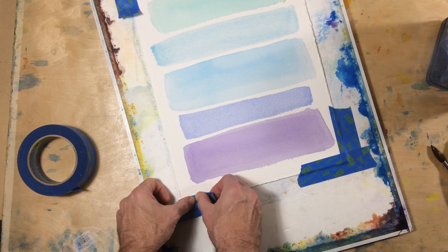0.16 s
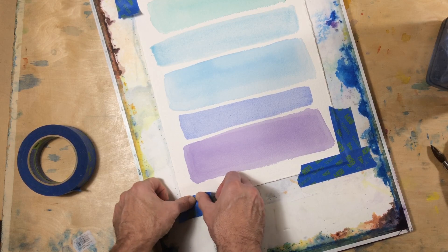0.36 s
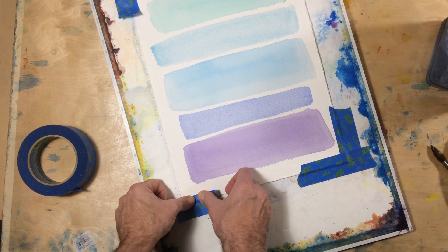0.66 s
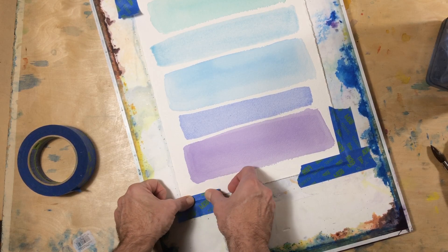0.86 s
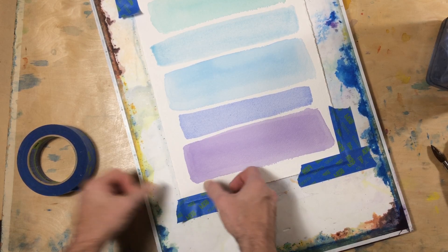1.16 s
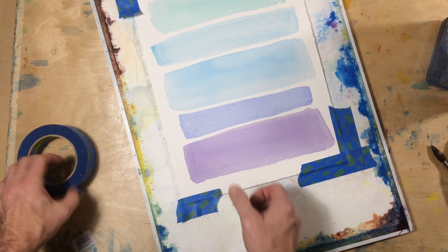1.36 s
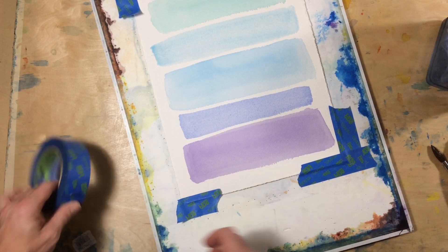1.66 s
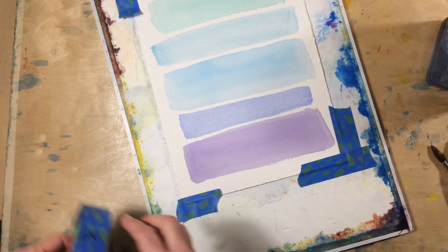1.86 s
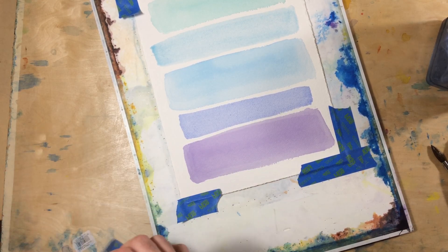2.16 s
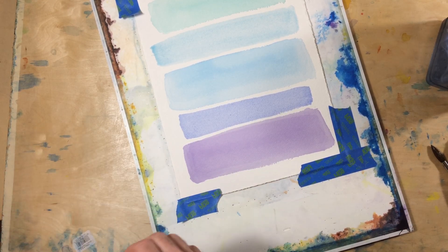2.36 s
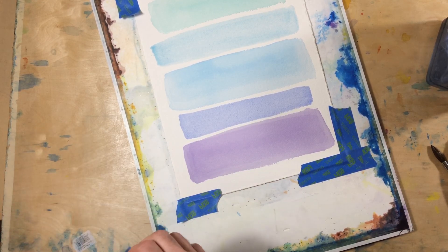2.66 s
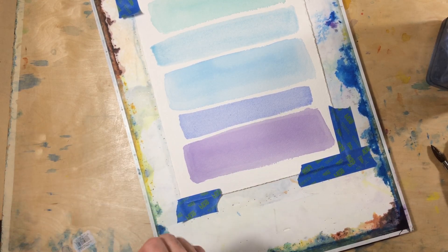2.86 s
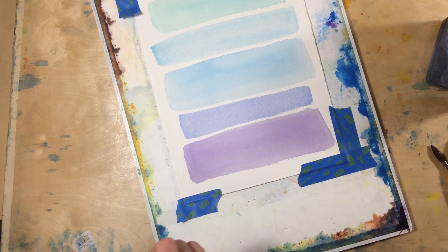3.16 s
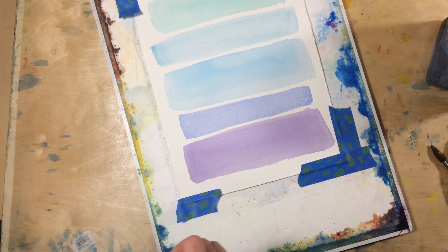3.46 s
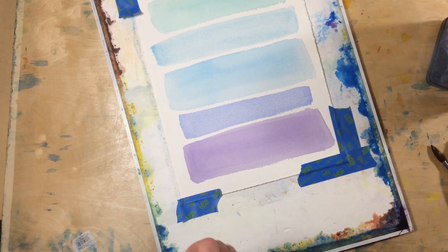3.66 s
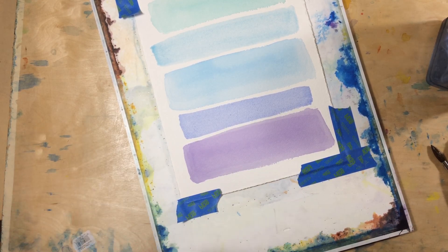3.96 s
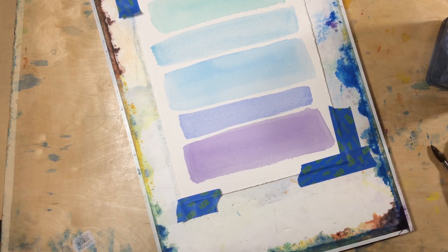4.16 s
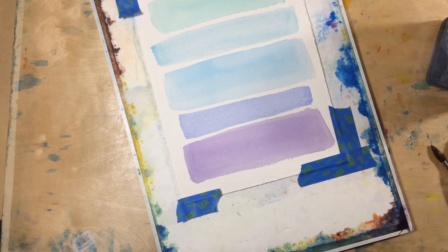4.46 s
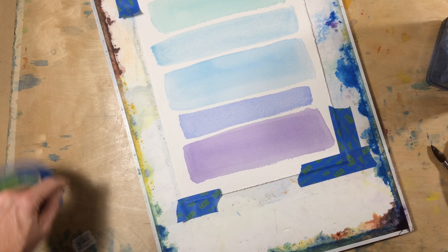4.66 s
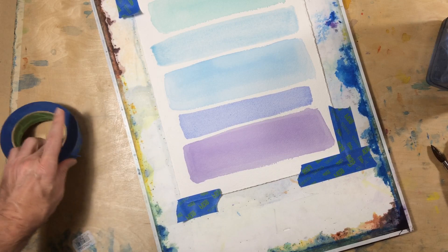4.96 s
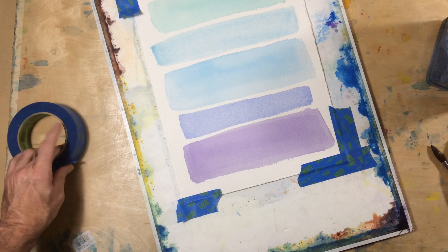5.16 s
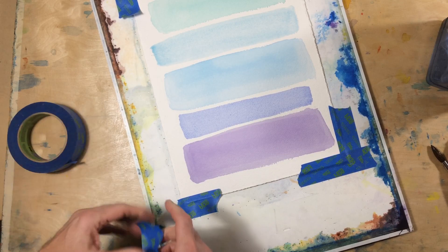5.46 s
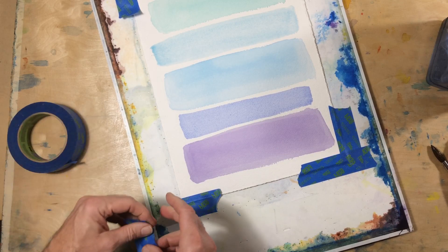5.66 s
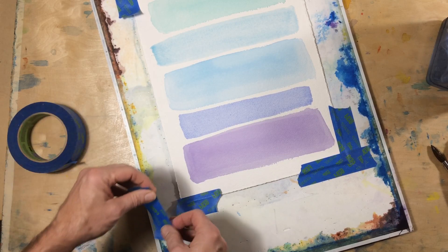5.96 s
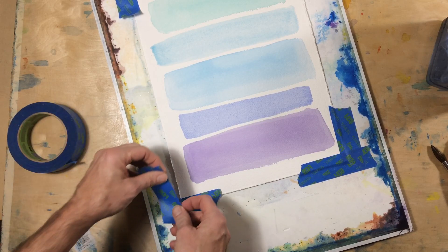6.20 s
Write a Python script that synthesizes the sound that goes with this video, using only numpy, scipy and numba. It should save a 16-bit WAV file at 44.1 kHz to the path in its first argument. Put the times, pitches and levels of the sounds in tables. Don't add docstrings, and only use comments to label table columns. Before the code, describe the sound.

Masking tape handled at a wooden desk: crisp ticks, a rasping two-part pull with falling hollow tone, a short rip, and a loud clack.

```python
import sys
import numpy as np
from scipy import signal
from scipy.fft import rfft, irfft
from scipy.io import wavfile
from scipy.ndimage import uniform_filter1d
from numba import njit

SR = 44100
rng = np.random.default_rng(int(sys.argv[2]) if len(sys.argv) > 2 else 0)


def generate_wav(signal):
    frames = np.transpose(np.atleast_2d(signal))
    scaled = np.clip(frames, -1, 1) * 32767
    pcm = np.round(scaled).astype(np.int16)
    wavfile.write(sys.argv[1], SR, pcm)


def volts(x):
    e = np.asarray(x, float) / 20
    return 10 ** e


N = 279153


def curve(tables, column, off=-130):
    t, out = np.arange(N) / SR, np.full(N, float(off))
    for rows in tables:
        rows = np.array(rows)
        inside = (t >= rows[0, 0]) & (t <= rows[-1, 0])
        out[inside] = np.interp(t[inside], rows[:, 0], rows[:, column])
    return out


def gain_curve(tables, column):
    return uniform_filter1d(volts(curve(tables, column)), size=201)


def swells(rows):
    t, out = np.arange(N) / SR, np.zeros(N)
    for s, db, rise, fall in rows:
        near = slice(max(int((s - 3 * rise) * SR), 0), int((s + 3 * fall) * SR))
        late = t[near] - s
        out[near] += volts(db - 20 * np.maximum(-late / rise, late / fall))
    return out


def rms_one(x):
    return x / np.sqrt(np.mean(x ** 2) + 1e-20)


def peak_one(x):
    return x / np.abs(x).max()


def coloured(x, spectrum):
    hz, db = np.transpose(spectrum)
    grid = np.maximum(np.arange(len(x) // 2 + 1) * SR / len(x), 1)
    gain = volts(np.interp(np.log(grid), np.log(hz), db, left=-90, right=-90))
    return rms_one(irfft(rfft(x) * gain, len(x)))


def band(x, low_hz, high_hz):
    sos = signal.butter(2, [low_hz, min(high_hz, .45 * SR)], "band", fs=SR, output="sos")
    return signal.sosfilt(sos, x)


def cut(x, top_hz):
    return signal.sosfilt(signal.ellip(10, .5, 60, top_hz, fs=SR, output="sos"), x)


def slow_wander(hz, rate, size):
    r = np.exp(-2 * np.pi * hz / rate)
    return rms_one(signal.lfilter([1], [1, -2 * r, r * r], rng.standard_normal(size)))


def grains(spread_db, clump_db, clump_hz):
    sizes = rng.standard_normal(N) * volts(spread_db * np.minimum(rng.exponential(1, N), 5))
    return sizes * volts(clump_db * slow_wander(clump_hz, SR, N))


def ring(x, hz, t60):
    r, w = volts(-60 / (t60 * SR)), 2 * np.pi * hz / SR
    return signal.lfilter([0, np.sin(w)], [1, -2 * r * np.cos(w), r * r], x)


@njit
def glide(x, hz, width):
    out = np.zeros(len(x))
    r = np.exp(-np.pi * width / SR)
    for i in range(2, len(x)):
        out[i] = x[i] - x[i - 2] + 2 * r * np.cos(2 * np.pi * hz[i] / SR) * out[i - 1] - r * r * out[i - 2]
    return out


def resonance(x, hz, width, second_width):
    return rms_one(glide(glide(x, hz, width), hz, second_width))


def patchy(x):
    centres, hop = np.log(np.geomspace(1500, 17000, num=9)), 64
    out, spectrum = 0, rfft(x)
    grid = np.log(np.maximum(np.arange(N // 2 + 1) * SR / N, 1))
    for share in np.eye(len(centres)):
        slow = slow_wander(14, SR / hop, N // hop + 2)
        part = irfft(spectrum * np.interp(grid, centres, share), N)
        patch_db = 1.5 * np.interp(np.arange(N) / hop, np.arange(len(slow)), slow)
        out = out + part * volts(patch_db)
    return rms_one(out)


def peel():
    # (frequency [Hz], level [dB per Hz])
    rasp = [(1650, -12.5), (2800, -9), (3220, -9.5), (3480, -8.5), (4310, -2.5), (5090, -3.5), (6570, -2.5),
            (9130, -7), (15100, -8.5), (16200, -14)]
    # (time [s], tone [Hz], tautness [dB])
    strip = [
        (3.0, 620, -27),
        (3.07, 587, -18),
        (3.13, 554, -13),
        (3.2, 594, -21),
        (3.33, 755, -5),
        (3.41, 652, -3.5),
        (3.5, 535, -5.5),
        (3.58, 420, -3.5),
        (3.79, 395, -15.5),
    ]
    # (time [s], level [dB])
    pulls = [
        [(3.0, -69), (3.042, -50), (3.056, -53), (3.078, -45), (3.09, -46), (3.162, -69), (3.2, -58)],
        [(3.2, -58.5), (3.236, -47.5), (3.368, -50), (3.474, -43), (3.592, -49), (3.646, -45), (3.696, -48.5),
         (3.79, -74)],
    ]
    grip_s, slack_s, long_pull_s = 3.058, 3.202, 3.137
    t = np.arange(N) / SR
    slips = grains(spread_db=2.5, clump_db=1.4, clump_hz=160)
    hz, pull, taut = curve([strip], 1, off=550), gain_curve(pulls, 1), gain_curve([strip], 2)

    tone = resonance(slips, hz, 100., 200.)
    hollow = resonance(slips, np.full(N, 480.), 87., 98.)
    tone = band(tone + volts(-11) * hollow, 200, 2200)

    upper = resonance(slips, 3.536 * hz, 260., 450.)
    lower = resonance(slips, 2.24 * hz, 260., 450.)
    come_and_go = volts(2.5 * rms_one(band(rng.standard_normal(N), 8, 30)))
    ringing = np.clip(np.abs(t - slack_s) / 0.2, .1, 1) ** 2
    flat = grains(spread_db=2.0, clump_db=1.8, clump_hz=110)
    flat = band(band(flat, 950, 3600), 950, 3600)
    middle = 0.75 * ringing * come_and_go * (upper + 0.37 * lower) + 0.67 * rms_one(flat)
    gripped = np.clip((t - grip_s) / 0.02 + 1, .1, 1)
    body = gripped * volts(2 - 32.5 * np.maximum(t - long_pull_s, 0))

    front_hz = 4200 - 5000 * np.clip(t - slack_s, 0, .25)
    front = resonance(slips, front_hz, 400., 700.)
    fading = (t > grip_s) * np.clip(1 - (t - long_pull_s) / 0.2, 0, 1)
    front = front * (volts(-26) * pull + 0.5 * np.minimum(pull, volts(-50)) * fading)
    return pull * (patchy(coloured(slips, rasp)) + body * middle + taut * tone) + front


def tear():
    # (frequency [Hz], level [dB per Hz])
    rip = [(180, -55.5), (300, -24.5), (1970, -12.5), (4370, -1.5), (4670, -5), (10700, -6), (16000, -14.5)]
    # (time [s], peak [dB], rise [s], fall [s])
    bursts = [
        (4.5955, -27.5, 0.0013, 0.0074),
        (4.606, -44.5, 0.0045, 0.081),
        (4.625, -18.5, 0.013, 0.022),
    ]
    # (time [s], peak [dB], rise [s], fall [s])
    scuffs = [
        (1.619, -39.5, .002, 0.019),
        (1.633, -44, 0.021, 0.0099),
    ]
    fibres = grains(spread_db=1.6, clump_db=2.0, clump_hz=300)
    return swells(bursts) * coloured(fibres, rip) + swells(scuffs) * rms_one(band(fibres, 900, 5650))


def snaps(rows, broad_db, wake_ms):
    size, spread = 5000, 1.18
    out, t = np.zeros(N + size), np.arange(size) / SR
    noise = rng.standard_normal((len(rows), size))
    uneven = volts(2.5 * np.minimum(rng.exponential(1, (len(rows), size)), 5))
    for (s, db, hz, wake_db), white, grain in zip(rows, noise, uneven):
        spike = white * t * np.exp(-t / .00038)
        broad = band(spike, min(hz / 2, 2200), 13000)
        narrow = band(signal.unit_impulse(size, 12), hz / spread, hz * spread)
        thud = band(white * np.exp(-t / 0.0038), 440, 1300)
        shape = peak_one(narrow) + volts(broad_db) * peak_one(broad) + volts(-24) * peak_one(thud)
        wake = band(white * grain * np.exp(-t * 1000 / wake_ms), hz / 2, hz * 2.2)
        i = round((s + .0007) * SR)
        out[i:i + size] += volts(db) * (peak_one(shape) + volts(wake_db) * peak_one(wake))
    return out[:N]


def glue_ticks():
    # (time [s], peak [dB], ring [Hz], wake [dB])
    ticks = [(.1074, -36.5, 4100, -14.5), (.3483, -40, 5400, -5.5), (.4614, -25, 3980, -20),
             (1.1296, -36, 11400, -17), (1.5502, -31, 3500, -7.5), (1.261, -56, 8000, -8),
             (1.783, -56, 9140, -8), (2.1852, -53, 6600, -14), (2.4811, -28.5, 6400, -12),
             (2.967, -47, 10200, -17), (3.036, -33, 6130, -13), (3.661, -34, 12000, -14),
             (3.671, -34, 13400, -16), (3.8331, -33, 12000, -2), (4.7827, -41, 6800, -18.5),
             (5.6491, -26.5, 6200, -10.5), (5.9556, -50, 3180, -3), (6.0387, -52, 5260, -19.5),
             (6.0666, -51, 6650, -15), (5.677, -50, 5900, -16)]
    return snaps(ticks, broad_db=-4.5, wake_ms=10.5)


def cracks():
    # (time [s], peak [dB], ring [Hz], wake [dB])
    buckles = [(.3729, -35, 4660, -1.5), (.833, -57, 3360, -21), (1.1121, -43.5, 2280, -12),
               (1.163, -51, 3360, -14), (1.3192, -49, 4220, 0), (1.329, -40.5, 5600, -8),
               (1.371, -49, 5800, -30), (1.508, -52.5, 1420, 1.5), (1.7248, -48, 1500, 3),
               (1.738, -63, 3000, -10), (1.751, -60, 3200, -4), (4.333, -54, 2500, -4),
               (1.5589, -38.5, 1940, 9), (1.8367, -61, 2390, -2.5), (2.6795, -46, 6850, -38),
               (2.925, -53.5, 6400, 3), (3.8554, -26.5, 8770, -11.5), (4.033, -49.5, 14000, -7),
               (4.583, -64, 13500, -10), (4.594, -34, 4770, -11.5), (4.8, -54, 7460, -15.5),
               (4.8154, -42, 6400, -13.5), (4.8381, -38.5, 5650, -14), (4.847, -37, 9600, -12.5),
               (4.9633, -31.5, 3500, -11), (5.3006, -34, 1980, -5.5), (5.6486, -33.5, 2100, -8.5),
               (5.677, -41.5, 2120, -6), (5.8737, -52, 2520, -13), (5.9211, -28.5, 12270, -4),
               (6.106, -49.5, 12040, -11)]
    return snaps(buckles, broad_db=3, wake_ms=9.0)


def flap_flicks():
    # (time [s], peak [dB], ring [Hz], wake [dB])
    flicks = [
        (.156, -38, 4000, -13),
        (.172, -47, 3900, -33),
        (.186, -51, 3700, -10),
        (1.4237, -38, 5020, -13),
        (5.66, -37, 5660, -8),
        (6.145, -55, 4500, -11),
        (6.1528, -46, 4710, -17.5),
        (6.1797, -51, 4120, -5),
        (6.1974, -51, 4450, -2.5),
    ]
    return snaps(flicks, broad_db=-41, wake_ms=9.4)


def knocks():
    # (time [s], peak [dB], contact cut [Hz], rattle [dB])
    hits = [(1.111, -45, 1500, -6), (1.165, -48, 1100, -14), (1.5505, -32.5, 810, 0.5),
            (1.5605, -36, 950, -7), (1.567, -30.5, 457, -8.5), (1.5711, -54, 600, -11),
            (1.58, -61, 600, -19), (3.857, -56, 1420, 10), (3.856, -58, 410, 9), (5.65, -57.5, 1500, 7),
            (5.922, -56.5, 901, 6.5), (5.0888, -21.5, 590, -10.5), (5.096, -27, 400, -28),
            (5.1, -29.5, 434, -16.5), (5.217, -45.5, 451, -9.5), (5.226, -36, 600, -7.5),
            (5.2387, -4.5, 2200, -10), (5.244, -24, 1210, -23), (5.249, -22.5, 1800, -3.5),
            (5.2532, -26.5, 2000, -3.5), (5.297, -43.5, 286, -10.5)]
    # (frequency [Hz], level [dB], t60 [s])
    modes = [(63, -15.5, 0.28), (99, -17, 0.048), (146, -22, 0.1), (171, -19, 0.078), (217, -15, 0.11),
             (257, -20.5, 0.097), (300, -14.5, 0.1), (360, -18.5, 0.54), (410, -27.5, 0.097),
             (576, -29.5, 0.024), (600, 2, 0.028), (651.7, 4, 0.034), (690, -3.5, 0.0098),
             (758.3, 3, 0.019), (816, -7, 0.07), (910, -7.5, 0.024), (952, -12.5, 0.071),
             (1024, -10.5, 0.044), (1258, -7, 0.042), (1090, -16.5, 0.035), (1345, -10, 0.18),
             (1505, -12.5, 0.12), (1578, -7, 0.019), (1800, -14, 0.017), (1940, -7.5, 0.03),
             (2180, -11.5, 0.034), (2444, -5.5, .015), (2630, -7, 0.007), (3037, -5, 0.0098),
             (3490, 1, 0.0063), (3360, -15.5, 0.008), (3800, -15, 0.014)]
    size = 16000
    out, click, t = np.zeros(N + size), signal.unit_impulse(size), np.arange(size) / SR
    chance = rng.normal(0, 1.5, (len(hits), len(modes)))
    fade = np.exp(-t / 0.0061) + volts(-11.5) * np.exp(-t / 0.024)
    loose = rng.standard_normal((len(hits), size)) * fade
    for (s, db, cut_hz, rattle_db), own_db, shake in zip(hits, chance, loose):
        push = signal.sosfilt(signal.butter(3, cut_hz, fs=SR, output="sos"), click)
        rattle = band(band(shake, 20, 0.96 * cut_hz), 300, 5000)
        body = 0
        for k, (hz, mode_db, t60) in enumerate(modes):
            t60 = min(t60, 45 / hz)
            sense = (-1) ** k
            body = body + sense * volts(mode_db + own_db[k]) * ring(push, hz, t60)
        i = round(s * SR)
        out[i:i + size] += volts(db) * (peak_one(body) + volts(rattle_db) * peak_one(rattle))
    return band(out[:N], 130, 13000)


def thumps():
    # (time [s], peak [dB], pitch [Hz], t60 [s])
    landings = [
        (1.5492, -32, 300, 0.023),
        (1.5604, -33, 345, 0.035),
        (1.567, -34.5, 286, 0.035),
        (1.58, -41, 198, 0.034),
        (5.0883, -30.5, 230, 0.045),
        (5.239, -23.5, 208, 0.054),
        (5.291, -38.5, 109, 0.068),
    ]
    out, size = np.zeros(N), SR // 2
    for s, db, hz, t60 in landings:
        i = round(s * SR)
        out[i:i + size] += volts(db) * band(ring(signal.unit_impulse(size), hz, t60), 50, 900)
    return out


def rustle():
    # (time [s], peak [dB], rise
    # [s], fall [s], brightness [dB])
    creasing = [(.17, -61.5, 0.052, 0.069, 7), (.4, -68, 0.16, 0.12, 5), (.634, -74, 0.11, 0.16, -1),
                (.893, -73, 0.077, 0.11, 2), (1.167, -67, 0.074, 0.072, 3), (1.272, -71, 0.026, .05, 1),
                (1.372, -71.5, 0.038, 0.11, 12), (1.512, -72, 0.019, 0.083, 21),
                (1.596, -70, 0.062, 0.11, -13), (1.741, -75.5, 0.071, 0.06, 9),
                (2.175, -79.5, 0.13, 0.073, 6), (2.35, -72.5, 0.13, 0.045, 5),
                (2.484, -74.5, 0.17, 0.033, 2), (2.63, -76.5, 0.13, 0.16, -10), (2.998, -73, 0.28, .02, 4),
                (3.8, -76, 0.036, 0.16, 8), (3.896, -79, .2, 0.029, 5.5), (4.036, -84, .06, 0.028, 10),
              (4.205, -65.5, .08, 0.2, 4.5), (4.452, -67.5, .05, 0.014, -3), (4.77, -76, .03, 0.65, 1.5),
              (4.92, -64, .5, .1, -5.5), (4.961, -54, 0.0176, 0.013, 6), (5.101, -73.5, .04, 0.22, -1),
              (5.245, -63, .05, 0.072, -7), (5.308, -75, .05, 0.066, 7), (5.6, -74.5, .17, 0.16, 2),
              (5.88, -60, 0.024, 0.11, 5), (5.929, -68.5, .06, 0.092, 5), (6.05, -87, .2, 0.39, 1),
              (6.191, -79.5, .3, .15, 1)]
    # (time [s], peak [dB], rise [s], fall [s])
    rubs = [(.17, -74, 0.044, 0.026), (.404, -67.5, 0.54, 0.14), (.634, -76.5, 0.26, 0.074),
            (0.892, -64.5, 0.088, .075), (1.167, -68.5, 0.069, 0.09), (1.272, -72, 0.021, 0.13),
            (1.594, -46, 0.054, .08), (1.748, -58.5, 0.064, 0.018), (3.8, -81, .02, 0.2),
            (4.204, -88, 0.11, .3), (4.416, -77, 0.7, 0.14), (4.959, -64, .23, 0.091),
            (5.11, -61, 0.025, 0.35), (5.483, -84, .05, 0.22), (5.652, -71.5, 0.067, 0.098),
            (5.858, -64, 0.0061, 0.14), (5.93, -63.5, 0.068, 0.088), (6.19, -84, 0.27, 0.28)]
    creases = creasing
    dull = [(s, db - tilt_db / 2, rise, fall) for s, db, rise, fall, tilt_db in creases]
    bright = [(s, db + tilt_db / 2, rise, fall) for s, db, rise, fall, tilt_db in creases]
    out = 0
    for rows, low_hz, high_hz in ((rubs, 500, 3200), (dull, 2600, 7200), (bright, 6800, 17500)):
        crackle = grains(spread_db=1.2, clump_db=1.2, clump_hz=50)
        hands = swells(rows) + volts(-103.5)
        out = out + hands * rms_one(band(crackle, low_hz, high_hz))
    return out


def echoes():
    # (frequency [Hz], t60 [s], level [dB])
    room = [(100, 0.48, 1.5), (250, 0.42, -5), (400, 0.4, 0), (640, 0.21, -2.5), (950, 0.29, -1),
            (1500, 0.29, -0.5), (4000, 0.24, -5), (8000, 0.2, -3), (14000, 0.18, -1.5)]
    t = np.arange(SR // 2) / SR
    hz, t60, db = np.transpose(room)
    white, tail, edges = rng.standard_normal((2, len(t))), 0, 40 * 1.4 ** np.arange(20)
    for k, (low, high) in enumerate(zip(edges, edges[1:])):
        at = np.log(low * high) / 2
        gain_db = np.interp(at, np.log(hz), db) - 60 * t / np.interp(at, np.log(hz), t60)
        tail = tail + band(white[k % 2], low, high) * volts(gain_db)
    first_echo_s = 0.0044
    tail = tail * np.clip(t / first_echo_s - 1, 0, 1) * np.clip(4 - t / .1, 0, 1)
    return volts(-11.5) * tail / np.sqrt(np.sum(tail ** 2))


def air():
    # (frequency [Hz], level [dB per Hz])
    murmur = [(12, -47), (20, -15.5), (44, 2), (70, 2.5), (150, 3), (527, -10), (607, -8.5), (698, -15.5),
              (873, -18), (1000, -15.5), (1190, -18.5), (6720, -29.5), (14700, -31.5), (16200, -33.5)]
    # (frequency [Hz], width [Hz], level [dB])
    drone = [(59.6, 5, -73), (120, 330, -82.5)]
    out = volts(-67) * coloured(rng.standard_normal(N), murmur)
    for hz, width, db in drone:
        out += volts(db) * rms_one(glide(rng.standard_normal(N), np.full(N, float(hz)), float(width)))
    return out


def scene():
    peeling = peel()
    tape = tear() + cracks() + glue_ticks() + flap_flicks()
    desk = knocks() + thumps()
    reflected = signal.fftconvolve(peeling + tape + desk, echoes())[:N]
    soft = peeling + reflected + rustle() + air()
    return (tape + desk + cut(soft, 15900))[None]


def top_cut(x):
    return signal.sosfilt(signal.butter(12, 17080, fs=SR, output="sos"), x)


def record(dry):
    return top_cut(cut(dry, 16800))


dry = scene()
out = record(dry)
generate_wav(out)
```